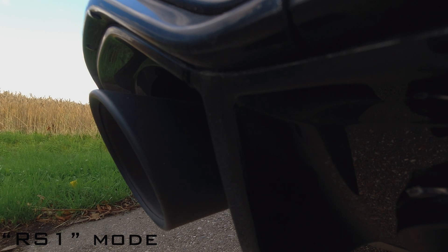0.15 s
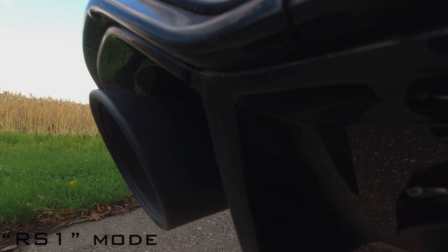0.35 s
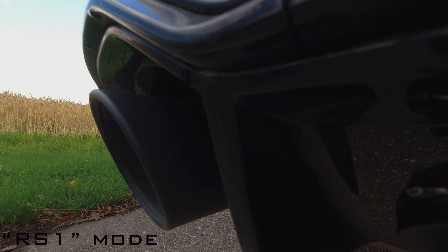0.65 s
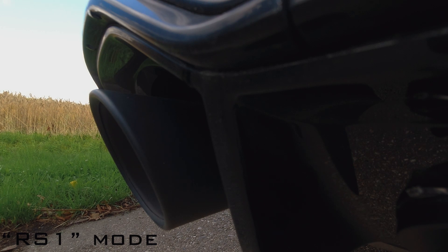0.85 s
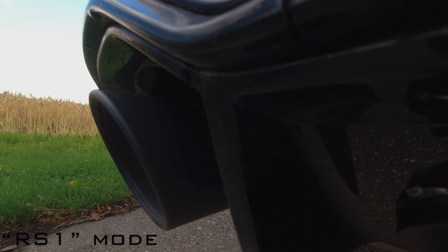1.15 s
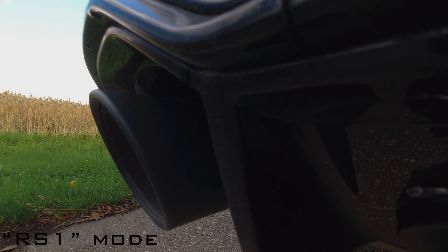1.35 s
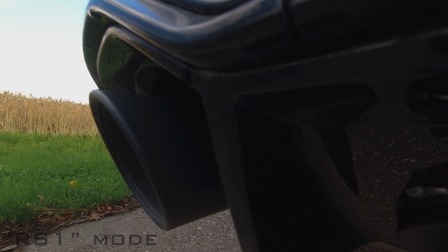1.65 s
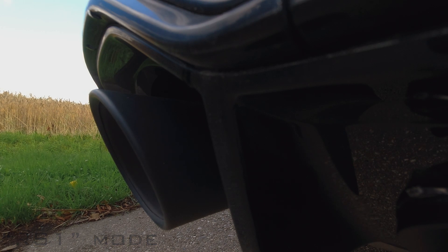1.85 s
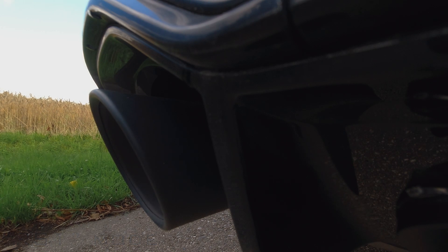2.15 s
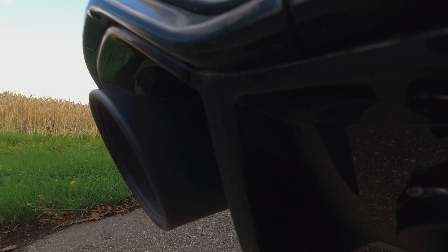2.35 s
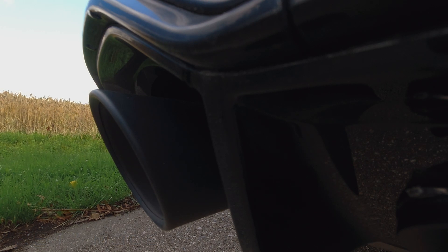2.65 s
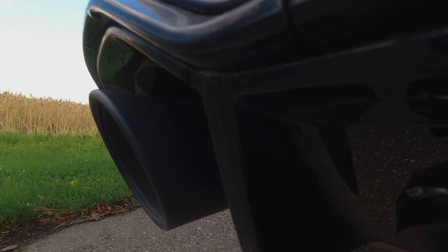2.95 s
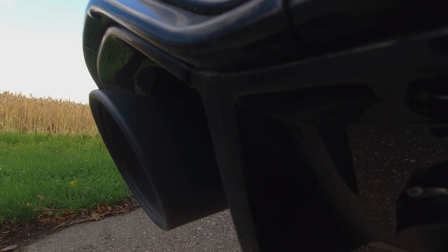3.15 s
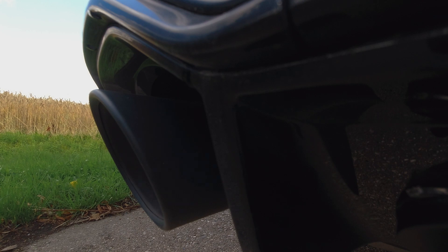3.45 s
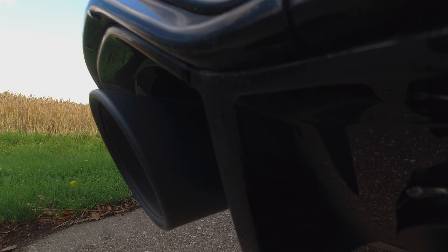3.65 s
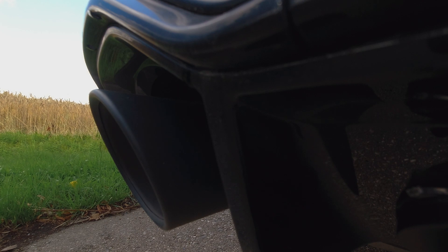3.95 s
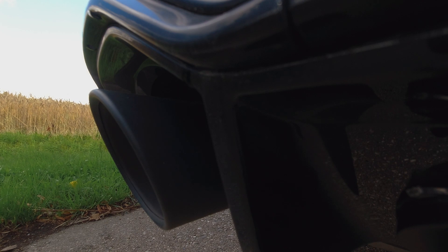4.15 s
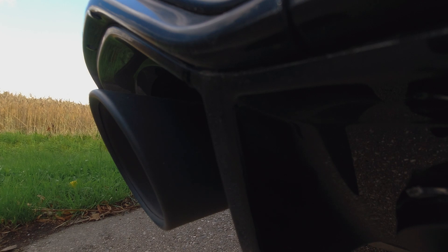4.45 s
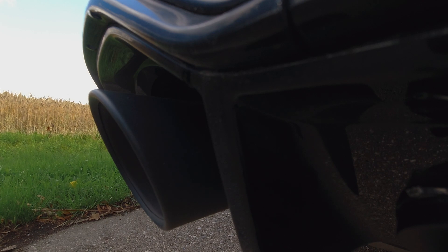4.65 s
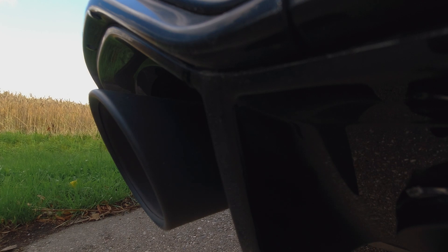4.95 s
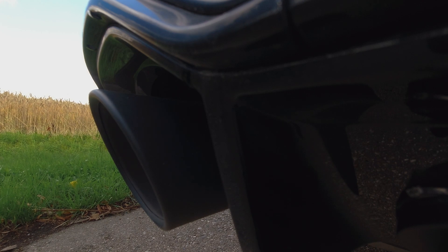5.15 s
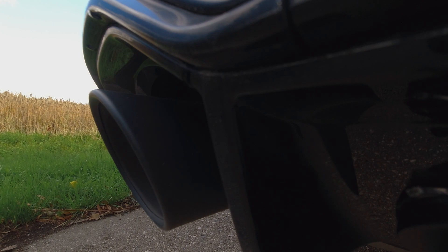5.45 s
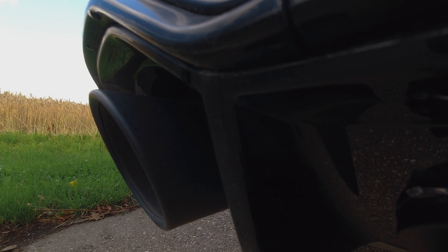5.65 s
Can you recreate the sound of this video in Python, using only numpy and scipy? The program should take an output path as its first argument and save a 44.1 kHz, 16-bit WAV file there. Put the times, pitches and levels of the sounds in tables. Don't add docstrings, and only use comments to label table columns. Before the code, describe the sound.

Close beside a tailpipe, a growling six-cylinder engine revs up three times, popping and cracking as each rev falls away.

```python
import sys
import numpy as np
from scipy import signal
from scipy.fft import rfft, irfft
from scipy.io import wavfile
from scipy.ndimage import uniform_filter1d

SR = 44100
rng = np.random.default_rng(int(sys.argv[2]) if len(sys.argv) > 2 else 0)


def voltage_ratio(level):
    return 10 ** (np.asarray(level, float) / 20)


def unload_audio(sound):
    columns = np.transpose(np.atleast_2d(sound))
    steps = np.round(np.clip(columns, -1, 1) * 32767)
    wavfile.write(sys.argv[1], SR, steps.astype(np.int16))


N = 256220

# time in seconds, firing rate of one bank in Hz.
REVS = [(0.0, 55), (0.364, 42.57), (0.51, 38.3), (0.62, 51.98), (0.776, 73.1), (0.964, 100.9),
        (1.05, 103.8), (1.35, 93.04), (1.866, 71.64), (2.002, 83.92), (2.265, 123.1), (2.7, 106.7),
        (3.508, 75.12), (4.045, 55.15), (4.216, 72.17), (4.55, 127.2), (5.02, 108.0), (5.81, 77.78)]
# touched in seconds, first opening 0-1, then floored, shut, afterburn over in seconds.
BLIPS = [
    (0.527, 1, .58, 1.05, 1.3),
    (1.862, 0.6, 1.9, 2.26, 2.66),
    (4.061, 0.47, 4.165, 4.541, 4.985),
]
# cylinders stop firing in seconds, then in dB the push on the orders,
# push on the hiss, push on growl and rasp, stumble at the touch.
PUSH = [
    (1.052, 2.5, 0, -1, -12),
    (2.288, -1, -1.5, -.6, -6),
    (4.572, 0, -1, 0.24, -9),
]
CYLINDER_DB = [0, -6, -1.5, -7.5, 1, -5]
CYLINDER_LAG = [0, .07, .015, .085, -.01, .06]
# heard pitch in Hz, coasting level in dB, open throttle level in dB.
BANK_ORDER = [(40, -40, -41.5), (54.7, -40, -36.5), (72, -34, -29), (84.4, -33.5, -29), (96.3, -37, -34),
              (104, -36.5, -40), (106.5, -33.5, -31.5), (127, -36, -27)]
FIRING_ORDER = [(76, -20.5, -17.5), (86, -18.5, -14.5), (108, -29.5, -13.5), (134.6, -27.5, -18.5),
                (158, -39, -27), (192.7, -48.5, -32), (199, -53.5, -28.5), (243.16, -59, -22)]
SECOND_ORDER = [(148.6, -42.5, -30), (197, -54, -36), (254, -52, -31), (295, -65.5, -34.5),
                (374, -82.5, -34), (404, -76, -30.5), (415, -58, -34), (481, -61.5, -21)]
THIRD_ORDER = [(229, -52, -48), (322, -46, -30.5), (390, -53.5, -40.5), (444, -42, -46),
               (504, -59.5, -43.5), (611, -45.5, -34.5), (632, -49.5, -66), (707, -61, -41)]
# frequency in Hz, width in Hz, level in dB.
GROWL_MODES = [(256, 100, -5.5), (345, 60, -0.5), (444, 117, -3), (554.7, 47.2, 6.5), (773, 84, 2.5),
               (845, 66, 1)]
RASP_MODES = [(1023, 109, -2), (1392.4, 72, 0.5), (1817, 124, -4.5), (2209, 146, -10.5), (2540, 95, -19)]
# frequency in Hz, level in dB, t60 in seconds.
RING_MODES = [(347.7, -4.5, 0.042), (550, 5, 0.026), (736.3, -1.5, 0.036)]
TIP_MODES = [(1306, 10, 0.026), (1674, -7.5, 0.051), (2360, 4, 0.005), (2800, -18.5, 0.0072)]
SILENCER_MODES = [(45, -12, 0.072), (62.9, -0.5, 0.14), (86.7, -1.5, 0.06), (117, -13, 0.087)]
# frequency in Hz, density in dB per Hz.
HISS = [(1650, -29), (2800, 0), (3160, -8), (3470, -4.5), (3840, -13.5), (4180, -5), (4560, -11),
        (5450, -13), (7680, -17), (8310, -19), (12500, -25.5), (15500, -32)]
RUMBLE = [(25, -16), (45, -6), (65, 0), (110, -3), (200, -6), (300, -12)]
# coasting level in dB at MID_HZ, slope in dB per octave of speed,
# dB added by open throttle, dB added by afterburn.
GROWL_LAW = (-42, 3.5, 13, 8.5)
RASP_LAW = (-47.5, 9, 12.5, 6)
HISS_LAW = (-76.5, 18.5, 15.5, 14.5)
# start in seconds, hiss level in dB, fading time in seconds.
GULPS = [
    (.57, -64.5, 0.24),
    (1.878, -68, .02),
    (4.195, -64, 0.027),
]
# start in seconds, end in seconds, strength 0-1.
FIERCE = [
    (1.076, 1.185, 0.44),
    (2.23, 2.494, .95),
    (4.544, 4.782, .95),
]
BURBLE_DB = [-10.5, -9.5, -11]
# centre in seconds, half length in seconds.
LULLS = [(2.539, 0.053), (4.782, 0.022), (4.823, 0.014), (4.889, 0.023), (4.955, 0.0093)]
# first crack in seconds, last crack in seconds, pipe ring in dB.
VOLLEYS = [
    (2.2913, 2.3285, -1.5),
    (2.353, 2.365, -0.5),
    (4.5733, 4.6328, 0.4),
    (4.6574, 4.6574, 0),
]
# start in seconds, snap level in dB, pipe ring in dB, boom in dB.
BANGS = [(1.071, -23.5, -5.5, -15), (1.1, -45, -7.5, 2), (2.2602, -23.5, -18.5, -13),
         (2.384, -43, -13.5, 1.5), (2.4049, -27.5, -22, -8), (2.5599, -30, -7, 7), (2.5664, -28, -12, -7.5),
         (2.6001, -36, -19, -6.5), (2.6191, -35, -19.5, -3.5), (4.5496, -22.5, -14, -10.5),
         (4.6798, -28.5, -18.5, 1.5), (4.7026, -37.5, -10.5, 1.5), (4.7197, -30, -17, 0),
         (4.7362, -46, -14.5, -20), (4.7563, -45.5, -20, -0.5), (4.793, -27, -10, -8.5),
         (4.8331, -29.5, -7.5, -2.6), (4.8457, -26, -10.5, 1.5), (4.9035, -29, -8, 1.5),
         (4.9234, -31, -20, -3.5), (4.9435, -36, -20.5, 1.5), (4.9639, -27, -12.5, 7)]
# start in seconds, boom in dB.
POPS = [(1.1235, -9), (1.1676, -16), (1.1889, -2.5), (1.2123, -1), (1.2437, -7.5), (1.261, -12.5),
        (1.2834, -12), (1.302, -7.5), (2.4378, -5), (2.4649, -7.5), (2.4828, -1), (2.5115, -5.5),
        (2.636, -8), (2.6509, -17)]
# start in seconds, peak level in dB, frequency in Hz.
THUMPS = [
    (.53, -21.5, 50),
    (1.049, -2, 63),
    (1.872, -9, 50),
    (1.934, -13, 70),
    (3.838, -44, 216),
    (4.031, -14, 45),
    (4.197, -11.5, 73.07),
]

OPEN_S, SETTLE_S, CATCH_S = 0.039, 0.14, 0.027
STUMBLE_S = 0.016
NULL_HZ, NULL_WIDTH_HZ, NULL_DB = 189.4, 8.3, -16
MID_HZ = 80
GROWL_EAGERNESS, RASP_EAGERNESS, HISS_EAGERNESS = 0.6, 1.2, 1.4
HANG_S, HANG_DB = 0.967, 3.5
WARM_DB, WARM_GROWL_DB, WARM_S = 4.5, -5.5, 0.3
LUG_HZ, LUG_DB = 50, 6.5
FIERCE_GROWL_DB, FIERCE_RASP_DB = 19, 3.5
OPEN_HISS_DB_PER_OCTAVE, HISS_FADE_DB_PER_S, HISS_SETTLE_S = 4.5, -22.5, 0.034
RUMBLE_UNDER_GROWL_DB, FLOOR_DB, LULL_DB = -7, -70, -22.5
CRANK_TURN_S, WEAK_TURN_DB, VOLLEY_SNAP_DB, VOLLEY_BOOM_DB = 0.012, -5, -14, 1
POP_SNAP_DB, POP_RING_DB = -44.5, -28.5


def rms_one(x):
    return x / np.sqrt(np.mean(x ** 2) + 1e-20)


def in_time(rows):
    s, *columns = np.transpose(rows)
    t = np.arange(N) / SR
    return [np.interp(t, s, column) for column in columns]


def ramps(*corners):
    return in_time(corners)[0]


def drift(rate):
    r = np.exp(-80 * np.pi * rate / SR)
    draws = rng.standard_normal(N // 40 + 2002)
    slow = signal.lfilter([1], [1, -2 * r, r * r], draws)[2000:]
    return np.interp(np.arange(N) / 40, np.arange(len(slow)), rms_one(slow))


def clicks_at(times, level_db):
    out = np.zeros(N)
    np.add.at(out, (np.asarray(times) * SR).astype(int), voltage_ratio(level_db))
    return out


def ring(clicks, modes):
    out = 0
    for hz, level_db, t60 in modes:
        r, w = voltage_ratio(-60 / (t60 * SR)), 2 * np.pi * hz / SR
        strike = [0, voltage_ratio(level_db) * np.sin(w)]
        out = out + signal.lfilter(strike, [1, -2 * r * np.cos(w), r * r], clicks + 1e-18)
    return out


def resonate(x, modes):
    out = 0
    for k, (hz, width, level_db) in enumerate(modes):
        r = np.exp(-np.pi * width / SR)
        top = (-1) ** k * voltage_ratio(level_db) * (1 - r * r) / 2
        out = out + signal.lfilter([top, 0, -top], [1, -2 * r * np.cos(2 * np.pi * hz / SR), r * r], x)
    return out


def cut(x, hz, kind, order=2):
    return signal.sosfilt(signal.butter(order, hz, kind, fs=SR, output="sos"), x)


def coloured(spectrum):
    hz, level_db = np.transpose(spectrum)
    bins = np.arange(1, N // 2 + 2) * SR / N
    gain = voltage_ratio(np.interp(np.log(bins), np.log(hz), level_db, left=-90, right=-90))
    return rms_one(irfft(rfft(rng.standard_normal(N)) * gain, N))


def levelled(x):
    return x / np.sqrt(uniform_filter1d(x ** 2, size=4000) + 1e-12)


def throttle():
    opening = 0
    for touched, part, floored, shut, _ in BLIPS:
        opening = opening + ramps((touched, 0), (touched + OPEN_S, part), (max(floored, touched + OPEN_S), part),
                                  (floored + 2 * OPEN_S, 1), (shut - 0.005, 1), (shut + 0.0086, 0))
    return opening


def pushed(column):
    blip = np.searchsorted([end for *_, end in BLIPS[:-1]], np.arange(N) / SR)
    return np.array(PUSH)[blip, column]


def order_levels(bank_hz, opening):
    shift_db = 0
    firing_on = 0
    for (touched, _, _, shut, _), (stop, *_, stumble_db) in zip(BLIPS, PUSH):
        firing_on = firing_on + ramps((shut - 0.02, 0), (shut - 0.01, 1), (stop, 1), (stop + 0.01, 0))
        shift_db = shift_db + stumble_db * ramps((touched - 2 * STUMBLE_S, 0), (touched - STUMBLE_S / 2, 1),
                                                 (touched + STUMBLE_S, 0))
    opening = np.maximum(opening, firing_on)
    shift_db = shift_db + opening * pushed(column=1)
    out = []
    for k, table in zip((1, 2, 4, 6), (BANK_ORDER, FIRING_ORDER, SECOND_ORDER, THIRD_ORDER)):
        hz, coast_db, open_db = np.transpose(table)
        coasting = (1 - opening) * np.interp(k * bank_hz, hz, coast_db)
        driven = opening * np.interp(k * bank_hz, hz, open_db)
        out.append(shift_db + coasting + driven)
    out[1] += opening * NULL_DB * np.exp(-((2 * bank_hz - NULL_HZ) / NULL_WIDTH_HZ) ** 2)
    return out


def orders(bank_turns, levels_db, unfired):
    bank_db = levels_db[0]
    tones = [(1, bank_db), (2 / 3, bank_db - 12), (4 / 3, bank_db - 23.5), (1 / 3, bank_db - 15)]
    tones += zip((2, 4, 6), levels_db[1:])
    out = sum(voltage_ratio(db + 2.0 * drift(10)) * np.cos(2 * np.pi * k * bank_turns) for k, db in tones)
    return np.sqrt(2) * out * voltage_ratio(-16 * unfired)


def gas_flow(bank_hz, opening):
    t, octaves = np.arange(N) / SR, np.log2(bank_hz / MID_HZ)

    def afterburn(settle_s):
        return sum((t > shut) * np.exp(-np.maximum(t - end, 0) / settle_s) for *_, shut, end in BLIPS)

    hanging_db = HANG_DB * opening * ramps((HANG_S - 0.04, 0), (HANG_S + 0.018, 1), (1.2, 1), (1.3, 0))

    def flow_db(law, heat, eagerness):
        base, slope, opened, burnt = law
        return base + slope * octaves + opened * opening ** eagerness + burnt * heat + hanging_db

    burning = afterburn(SETTLE_S)
    growl_db = flow_db(GROWL_LAW, burning, GROWL_EAGERNESS)
    rasp_db = flow_db(RASP_LAW, burning, RASP_EAGERNESS)
    hiss_db = flow_db(HISS_LAW, afterburn(HISS_SETTLE_S), HISS_EAGERNESS)

    fierce = sum(ramps((a - 0.01, 0), (a + 0.0079, p), (b - 0.04, p), (b + 0.044, 0)) for a, b, p in FIERCE)
    warm = np.exp(-t / WARM_S)
    push_db = opening * pushed(column=3)
    lugging = (1 - opening) * np.clip((LUG_HZ - bank_hz) / 8, 0, 1)
    growl_db += WARM_GROWL_DB * warm + push_db + FIERCE_GROWL_DB * fierce + LUG_DB * lugging
    rasp_db += WARM_DB * warm + push_db + FIERCE_RASP_DB * fierce

    hiss_db += opening * (pushed(column=2) + OPEN_HISS_DB_PER_OCTAVE * octaves)
    hiss_db += HISS_FADE_DB_PER_S * sum(ramps((shut, 0), (end, end - shut), (end + HISS_SETTLE_S, 0))
                                        for *_, shut, end in BLIPS)
    gulps = sum(voltage_ratio(db) * (t > s) * np.exp(-np.maximum(t - s, 0) / fading) for s, db, fading in GULPS)
    return growl_db, rasp_db, 20 * np.log10(voltage_ratio(hiss_db) + gulps)


def exhaust(bank_turns, fuel_cut, growl_db, rasp_db, hiss_db):
    cycles = int(bank_turns[-1] / 3) + 1
    fired_at = np.arange(6 * cycles) + np.tile(CYLINDER_LAG, cycles)
    firing = np.searchsorted(fired_at, 2 * bank_turns, side="right") - 1
    scatter_db = 0.7 * rng.standard_normal((cycles, 6))
    strength = voltage_ratio(np.array(CYLINDER_DB) + scatter_db).ravel()[firing]
    pulses = rms_one(strength * (np.diff(firing, prepend=0) > 0))
    load = np.clip((rasp_db + 46) / 14, 0, 1)
    pulses = load * pulses + (1 - load) * cut(pulses, 620, "low")
    pulses = (1 - 0.7 * fuel_cut) * pulses
    puffs = np.sqrt(strength) * (0.5 + np.exp(-3.0 * (2 * bank_turns - fired_at[firing])))
    noise = rng.standard_normal((2, N))

    growl = resonate(2.1 * pulses + rms_one(puffs * noise[0]), GROWL_MODES)
    growl = cut(cut(growl, 910, "low", order=6), 160, "high")
    rasp = resonate(1.4 * pulses + rms_one(puffs * noise[1]), RASP_MODES)
    rasp = cut(cut(rasp, 3100, "low", order=4), 960, "high", order=4)
    out = voltage_ratio(np.minimum(growl_db, -24)) * levelled(growl)
    out += voltage_ratio(rasp_db) * levelled(rasp)
    out += voltage_ratio(hiss_db) * rms_one(puffs * coloured(HISS))
    return out + voltage_ratio(growl_db + RUMBLE_UNDER_GROWL_DB) * coloured(RUMBLE)


def crack_rows():
    rows = list(BANGS) + [(s, POP_SNAP_DB, POP_RING_DB, db) for s, db in POPS]
    for first, last, db in VOLLEYS:
        count = round((last - first) / CRANK_TURN_S) + 1
        for k, s in enumerate(np.linspace(first, last, count)):
            ring_db = db + WEAK_TURN_DB * (k % 2)
            rows.append((s, ring_db + VOLLEY_SNAP_DB, ring_db, ring_db + VOLLEY_BOOM_DB))
    return rows


def backfires():
    s, snap_db, ring_db, boom_db = np.transpose(crack_rows())
    front = s + 0.0008
    out = cut(ring(clicks_at(s - 0.0003, ring_db + 5.0), RING_MODES), 1300, "low")
    out -= cut(ring(clicks_at(front, ring_db - 13), TIP_MODES), 3500, "low")
    out -= cut(ring(clicks_at(front, np.minimum(boom_db, 1) - 4), SILENCER_MODES), 300, "low")
    snaps = clicks_at(front, snap_db + 12)
    step = signal.lfilter([1], [1, -np.exp(-2 * np.pi * 900 / SR)], snaps)
    out -= cut(step, 4000, "low", order=1)
    tail = signal.lfilter([1], [1, -voltage_ratio(-60 / (0.042 * SR))], snaps)
    return out + voltage_ratio(-22.5) * tail * coloured(HISS)


def burble_level():
    rolling = 0
    for (*_, shut, end), db in zip(BLIPS, BURBLE_DB):
        rolling = rolling + voltage_ratio(db) * ramps((shut, 0), (shut + CATCH_S, 1), (end - 0.02, 1), (end + 0.023, 0))
    lulls = sum(ramps((s - half, 0), (s, 1), (s + half, 0)) for s, half in LULLS)
    return rolling * voltage_ratio(LULL_DB * lulls)


def burble(bank_turns, afterburn):
    turn = np.floor(bank_turns * 2 / 3 + 0.087 * drift(25)).astype(int)
    strength = voltage_ratio(4.0 * rng.standard_normal(turn.max() + 1))[turn]
    lit = strength * (np.diff(turn, prepend=0) > 0)
    boom = levelled(cut(ring(-lit, SILENCER_MODES), 180, "low"))
    spits = (rng.random(N) < 160 / SR) * voltage_ratio(2.4 * rng.standard_normal(N))
    rattle = ring(lit + spits, RING_MODES) + voltage_ratio(-14.0) * ring(spits, TIP_MODES)
    return afterburn * (boom + voltage_ratio(-14.5) * levelled(cut(rattle, 2400, "low", order=4)))


def thumps():
    return sum(cut(ring(-clicks_at([s], db), [(hz, 0, 0.09)]), 110, "low") for s, db, hz in THUMPS)


def noise_floor():
    return voltage_ratio(FLOOR_DB) * cut(rng.standard_normal(N), 6800, "low", order=1)


def scene():
    bank_hz, = in_time(REVS)
    bank_turns, opening = np.cumsum(bank_hz) / SR, throttle()
    fuel_cut, unfired = 0, 0
    for (*_, shut, end), (stop, *_) in zip(BLIPS, PUSH):
        fuel_cut = fuel_cut + ramps((shut - 0.01, 0), (shut, 1), (end, 1), (end + 0.02, 0))
        unfired = unfired + ramps((stop, 0), (stop + 0.01, 1), (end, 1), (end + 0.02, 0))
    engine = orders(bank_turns, order_levels(bank_hz, opening), unfired)
    engine += exhaust(bank_turns, fuel_cut, *gas_flow(bank_hz, opening))
    floor = noise_floor()
    return (engine + burble(bank_turns, burble_level()) + backfires() + thumps() + floor)[None]


def roll_off(x):
    return signal.sosfilt(signal.butter(12, 16500, fs=SR, output="sos"), x)


def record(dry):
    dry = cut(dry, 23, "high", order=1)
    top = np.where(dry > 0, 0.76, 0.9)
    squashed = dry / (1 + np.abs(dry / top) ** 3.0) ** (1 / 3.0)
    return roll_off(cut(squashed, 5.5, "high", order=1))


dry = scene()
out = record(dry)
unload_audio(out)
```